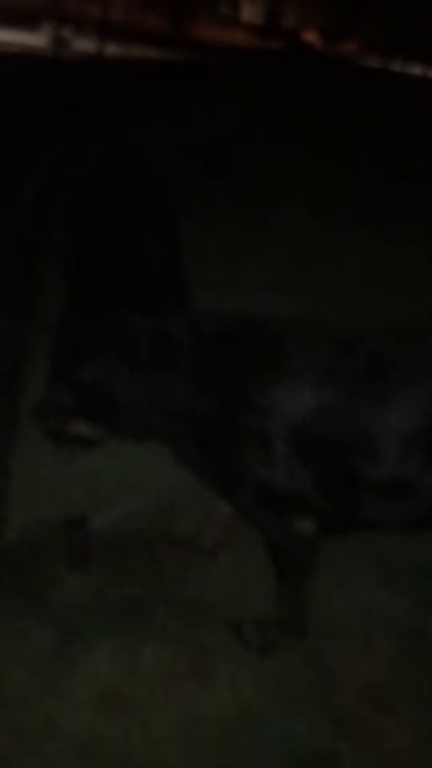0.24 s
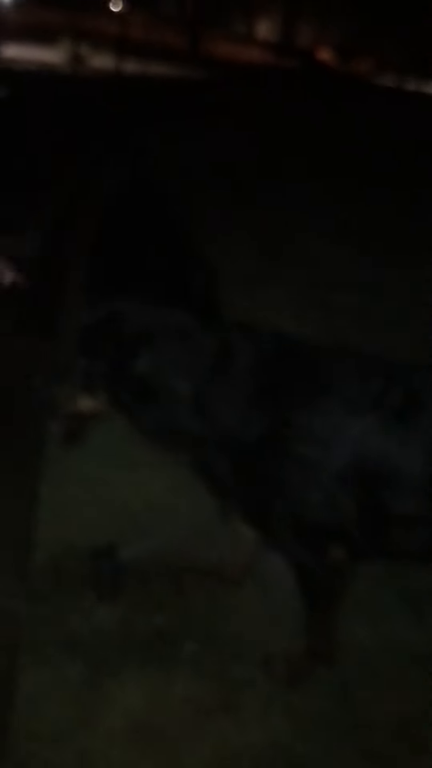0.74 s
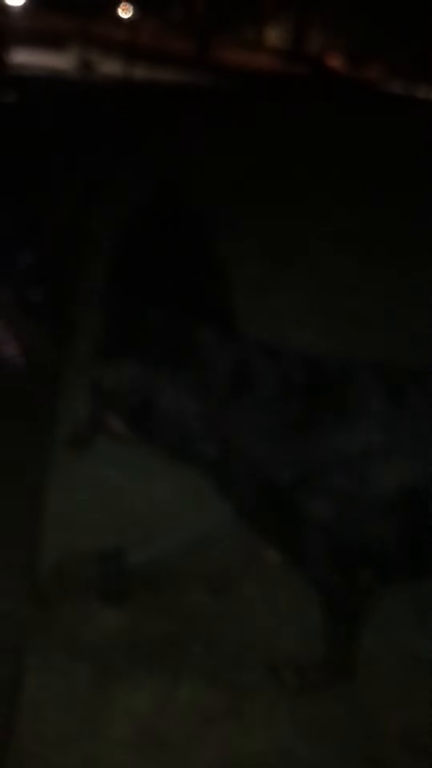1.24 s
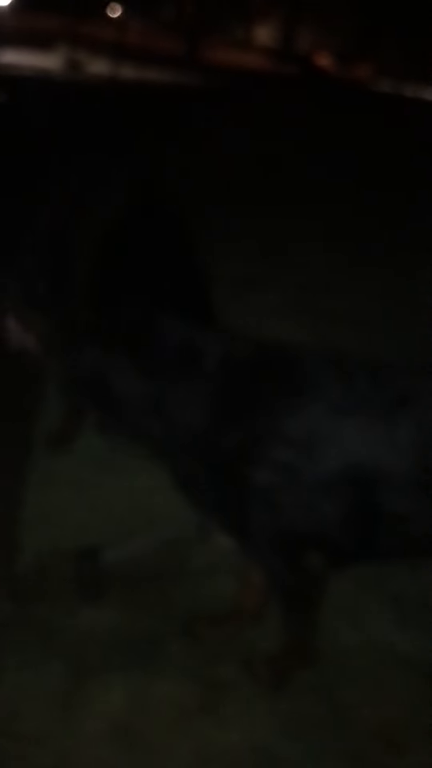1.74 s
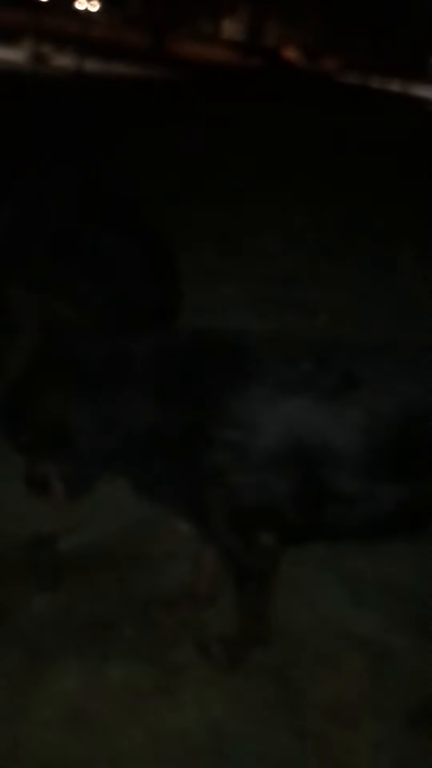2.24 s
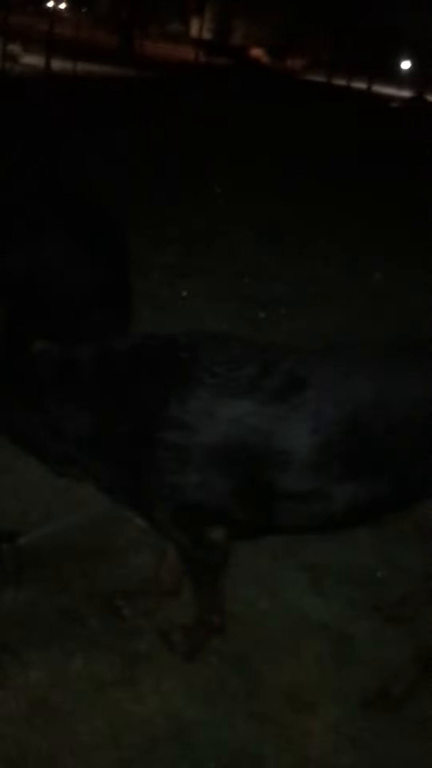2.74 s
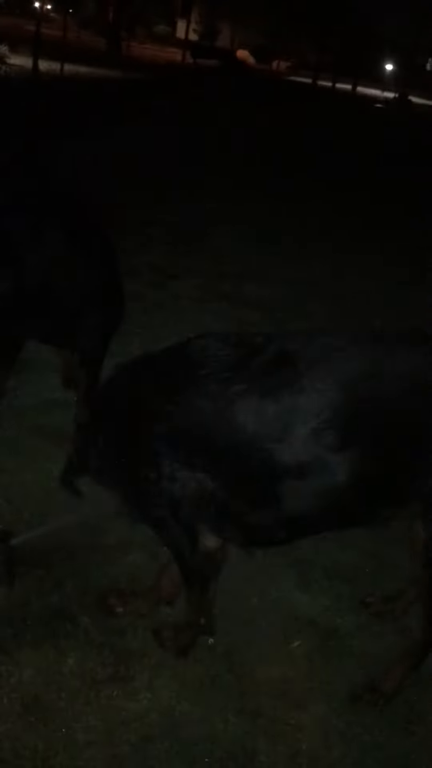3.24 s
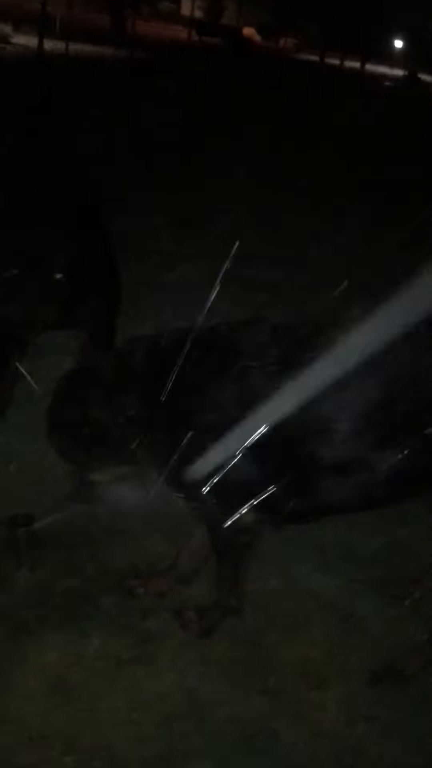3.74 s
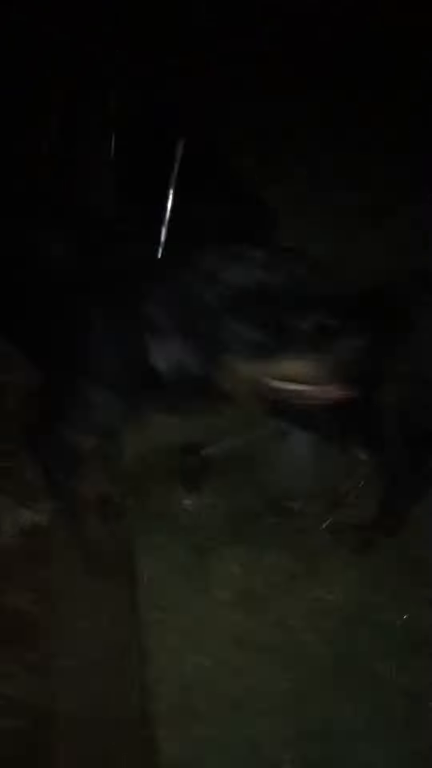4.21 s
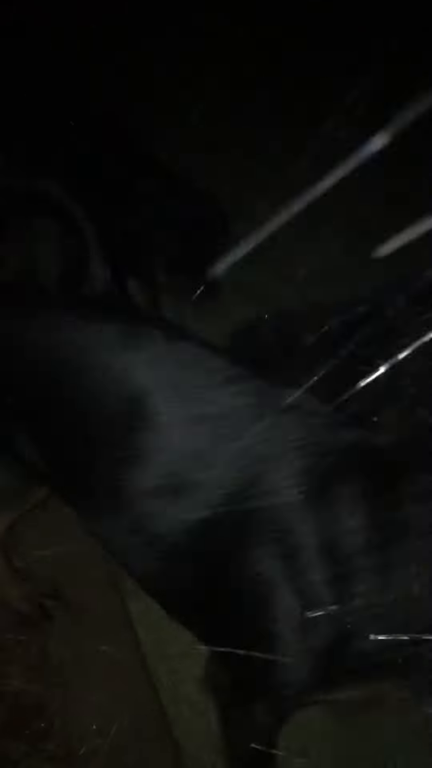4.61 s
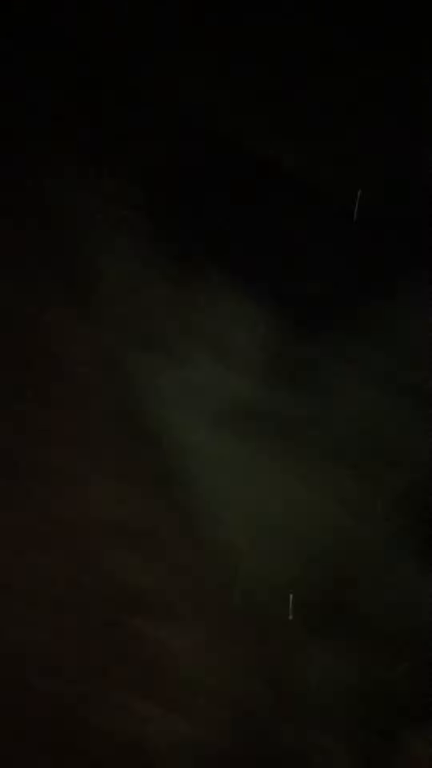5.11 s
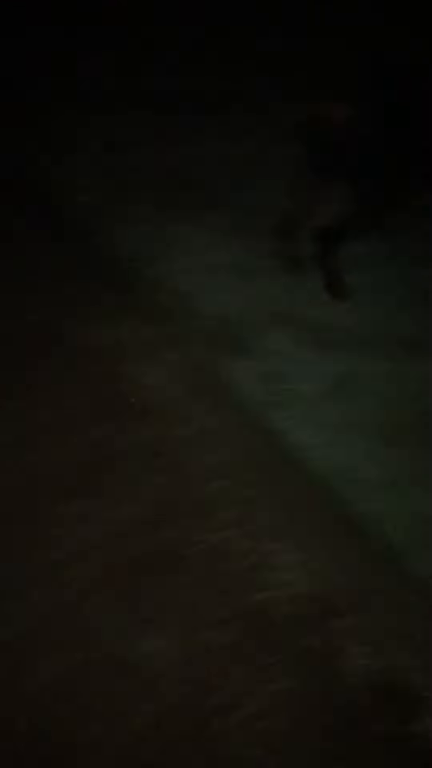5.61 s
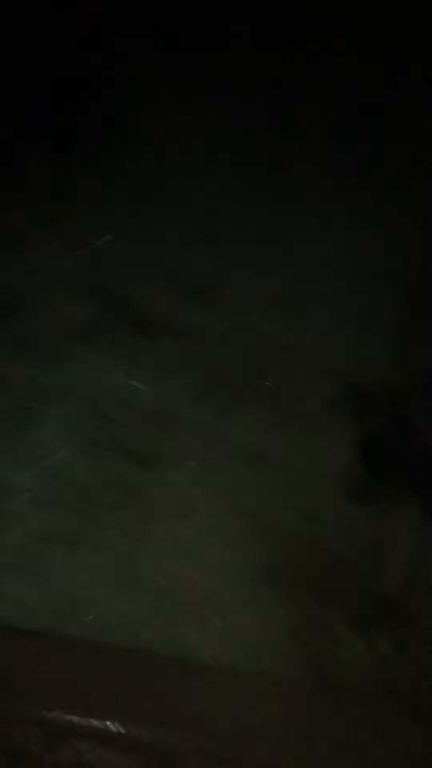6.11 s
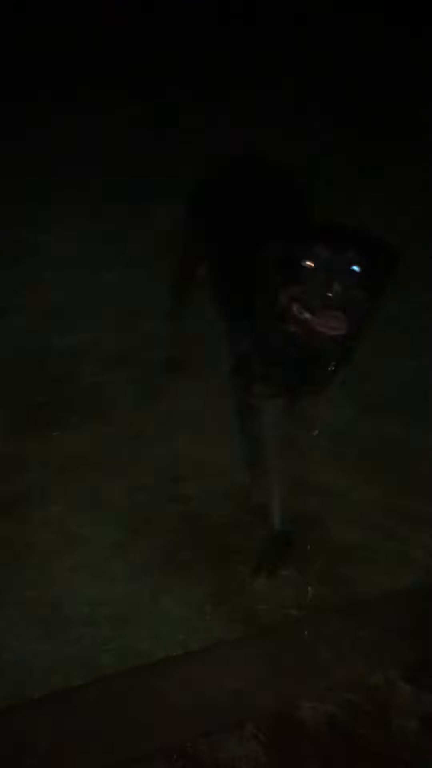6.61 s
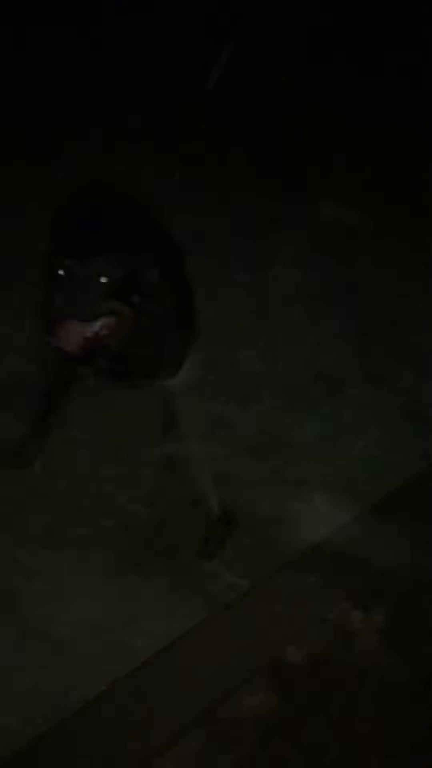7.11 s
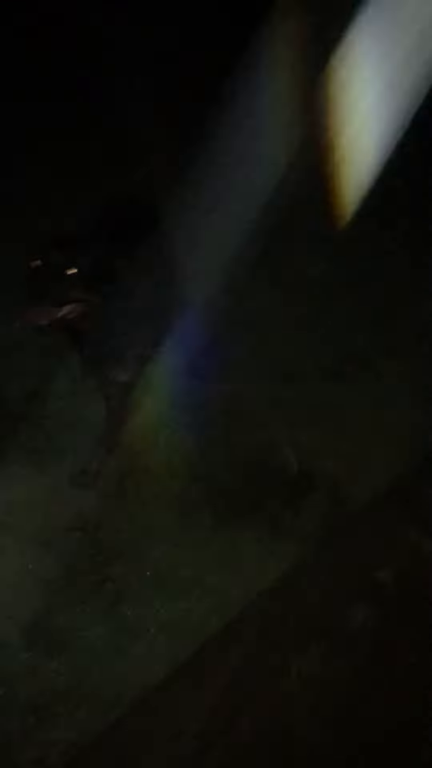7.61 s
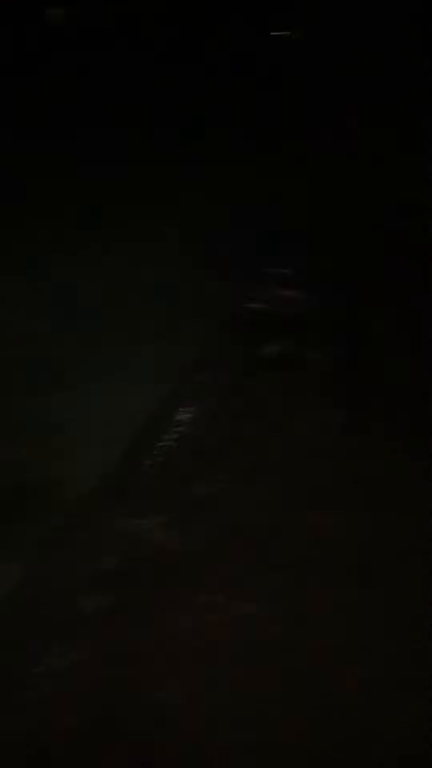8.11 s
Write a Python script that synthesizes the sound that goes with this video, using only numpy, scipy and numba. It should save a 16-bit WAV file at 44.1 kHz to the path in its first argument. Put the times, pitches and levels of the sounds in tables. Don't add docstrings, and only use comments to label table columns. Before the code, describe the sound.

Outdoors in a garden, captured in mono by a hand-held phone: steady bright water hiss with splashy lapping and short raspy pants. The biting grows busier midway, choppy and sputtering, with throaty gulps and sharp slaps of water. Then quick paw steps and clicking claws on hard ground amid low wind thumps. Finally the spray dies down to a faint hiss, panting, last steps and a low far-off town rumble.

```python
import sys
import numpy as np
from scipy import signal
from scipy.fft import rfft, irfft, next_fast_len
from scipy.io import wavfile
from scipy.ndimage import uniform_filter1d
from numba import njit

SR = 44100
rng = np.random.default_rng(int(sys.argv[2]) if len(sys.argv) > 2 else 0)


def to_linear_factor(level_db):
    exponent = np.asarray(level_db, float) / 20
    return 10 ** exponent


def file_out(sig):
    cols = np.atleast_2d(sig).T
    lim = np.clip(cols, -1, 1)
    pcm = np.round(lim * 32767).astype(np.int16)
    wavfile.write(sys.argv[1], SR, pcm)


N = 368235

# f/Hz, level/dB
TOWN_COLOUR = [(30, -28), (70, -7), (150, -5.5), (300, -5), (420, -7), (560, -5), (720, -6.5), (1000, -0.5),
               (2000, -7.5), (4000, -15.5)]
# t/s, level/dB
TOWN_LEVEL = [(0, -46.5), (.69, -51.5), (1.2, -49.5), (2.0, -49.5), (2.6, -48.5), (4.25, -49), (4.5, -46),
              (5.0, -49.5), (5.4, -49), (5.7, -51), (6.03, -48.5), (6.5, -51), (6.58, -53), (6.75, -53),
              (7.0, -51.5), (7.6, -51.5), (8.35, -53)]
# t/s, level/dB
STEADY_AIR = [
    (0, -52),
    (.5, -57),
    (4.3, -50.5),
    (4.7, -53),
    (7.3, -47),
    (8.35, -44.5),
]
# middle t/s, length t/s, level/dB
GUSTS = [(.28, 0.12, -39), (.76, .21, -47), (1.35, 0.3, -47), (1.67, 0.19, -51), (2.07, 0.19, -51),
         (2.3, 0.19, -54), (2.63, .12, -51), (3.05, 0.21, -47), (3.2, 0.23, -55), (3.65, .21, -55),
         (3.95, 0.069, -41), (4.56, 0.42, -47), (5.21, 0.22, -37), (6.49, .11, -43), (6.6, 0.14, -36.5),
         (6.77, 0.096, -27.5), (6.91, 0.12, -30), (7.07, 0.26, -29.5), (7.16, 0.072, -28),
         (7.49, 0.064, -38), (7.63, 0.23, -45), (7.95, 0.13, -41)]
# t/s, peak level/dB, ring f/Hz, claw brightness level/dB
STEPS = [(6.54, -13, 1400, -20), (6.645, -24, 900, -22), (6.753, -24, 800, -16), (6.921, -9, 3400, -8),
         (6.977, -9.5, 1510, -10), (6.991, -21.5, 223, -30), (7.083, -41, 500, -25), (7.18, -17, 900, -14),
         (7.289, -22, 850, -20), (7.388, -7.5, 1730, -5), (7.489, -21.5, 1000, -14), (7.588, -21, 1300, 1),
         (7.684, -25, 950, -12), (7.775, -20.5, 1700, 0.5), (7.863, -21, 1100, -6), (8.11, -30, 1000, -24)]
GROUND_ECHO_S, GROUND_ECHO_DB = .0019, -4
SCUFF_S, SCUFF_DB, SCUFF_TOP_DB = .012, -7, -21
# middle t/s, length t/s, level/dB, lowest throat resonance f/Hz
PANTS = [(0.114, 0.094, -43, 470), (0.398, 0.086, -42.5, 463), (0.684, 0.17, -45, 493),
         (0.963, 0.11, -42, 487), (1.229, 0.099, -46.5, 494), (1.661, 0.09, -44, 750),
         (2.03, 0.17, -39.5, 650), (2.371, 0.15, -43, 610), (2.76, 0.096, -43, 520), (3.24, 0.13, -47, 520),
         (4.094, 0.078, -50, 470), (4.654, 0.16, -41.5, 494), (4.894, 0.077, -41, 670),
         (5.242, 0.1, -43, 543), (5.525, 0.091, -44, 500), (6.476, 0.14, -39.5, 510),
         (6.841, 0.12, -37, 476), (7.207, 0.12, -38.5, 520), (7.54, 0.14, -39, 526),
         (7.76, 0.085, -46, 490), (7.875, 0.13, -37, 496), (8.088, 0.07, -45, 484), (8.215, 0.15, -38, 506)]
# f/Hz, width f/Hz, level/dB
THROAT = [(790, 110, -4), (1040, 120, 0), (1420, 130, -2), (1900, 200, -12), (2570, 250, -13),
          (3300, 400, -21)]
# t/s, level/dB
MIST_LEVEL = [(0, -23.5), (.75, -22), (1.1, -23.5), (1.4, -26), (1.77, -27.5), (1.9, -24), (2.32, -24),
              (3.1, -26.5), (4.07, -25), (4.4, -24), (5.5, -23.5), (6.05, -22.5), (6.12, -25.5),
              (7.13, -22), (7.19, -30.5), (7.4, -33), (7.47, -39), (8.35, -43)]
# f/Hz, level/dB
MIST_COLOUR = [(500, -26.5), (1000, -15), (2500, -1.5), (5000, -0.5), (9200, -2.5), (10400, -3),
               (11500, -0.5), (13000, -0.5), (16000, 0)]
COARSE_HZ, COARSE_WIDTH_HZ, COARSE_FOLLOWS = 4300, 4300, 0.41
# f/Hz, width f/Hz, level over the mist/dB
RIM = [(2710, 170, -2.5), (3410, 430, -10), (4720, 300, -2.5), (6130, 320, -4.5), (7210, 390, -3),
       (8320, 330, -4.5), (9480, 330, -6.5)]
# t/s, share 0-1
FACING = [
    (0, .6),
    (1.3, 0.96),
    (1.85, 1.),
    (3.0, 0.65),
    (4.2, 0.35),
    (5.5, 0.5),
    (7.2, .5),
    (7.5, .1),
]
# middle t/s, length t/s, change of level/dB
SHEETS = [(.1, .3, -3), (1.65, .5, 2), (3.09, .06, 1), (3.72, 0.13, 1), (4.0, 0.27, -2), (4.2, 0.11, 1),
          (4.372, .1, 1.5), (4.82, .12, 3), (5.2, .15, -0.5), (5.497, .1, 2), (5.33, .4, -3),
          (3.855, .06, 4), (5.91, .07, 6), (4.99, .16, -2), (5.75, .4, -2), (6.1, 0.4, -7), (6.63, 0.2, 2),
          (6.82, .1, 4), (7.05, .25, 2.5), (7.37, .12, 1), (7.9, 1.5, 3)]
SHEET_HZ, SHEET_WIDTH_HZ = 13600, 6500
# t/s, level/dB
SPLASH_LEVEL = [(0, -34.5), (.46, -25.5), (1.38, -24.5), (1.44, -45), (1.82, -40), (1.95, -29), (2.4, -27),
                (2.95, -30), (3.3, -29.5), (4.0, -28), (4.3, -32.5), (5.11, -37.5), (5.6, -30.5),
                (6.3, -21.5), (6.7, -33), (7.13, -22.5), (7.2, -39.5), (7.44, -46.5)]
# middle t/s, length t/s, splash change/dB, mist change/dB
SNAPS = [(1.28, 0.18, -9, -3), (1.426, 0.11, -5, -1.5), (5.02, 0.16, 1, -3), (2.13, 0.22, -2.5, -2),
         (3.018, 0.19, -6.5, 4), (3.09, 0.061, 3.5, 5), (4.885, 0.07, -5, -2), (3.36, 0.17, 4.5, -2),
         (3.72, 0.2, -2.5, 4), (3.863, 0.06, -7, -3), (3.99, 0.31, 5, 0.1), (4.202, 0.073, -8.5, 4.5),
         (4.232, 0.032, 8.5, -3.5), (4.335, 0.073, 3, 0.5), (4.44, 0.075, -10, -1),
         (4.55, 0.079, 6.5, -1.5), (4.645, 0.21, -6, -6), (4.925, 0.13, -5, -5), (5.168, 0.026, .3, 5),
         (5.253, 0.34, -14, 3.5), (5.455, 0.22, -16.5, 3.5), (5.6, 0.16, -0.5, -2.5), (5.365, .05, -3, -2),
         (5.138, .02, -4, -4), (4.6, .05, -3, -2), (5.525, .04, -3, -3), (5.932, 0.064, -10.5, -3),
         (5.957, 0.024, 0, 2), (6.065, 0.12, -8, 2.5), (6.47, 0.066, -2.5, 0), (6.527, 0.046, 2.5, 0),
         (6.814, 0.13, -1, -1.5), (7.283, .06, 7, 3), (4.946, .04, -8, -4), (3.447, 0.044, -6, 3.5),
         (6.743, 0.087, -0.5, -1.5), (5.4, 0.2, 0.5, -0.5), (5.7, 0.15, 1, 0), (4.1, 0.15, 0.5, 0),
         (.35, .1, 0, 0), (2.25, 0.12, -0.5, 0.5), (4.787, 0.075, 3, -1), (3.182, 0.035, 3.5, 2.5),
         (1.164, 0.14, 2, -3), (6.202, 0.19, -1.5, 2)]
SNAP_EDGE = .7
# t/s, f/Hz, depth level/dB
HOLLOW = [(0, 2000, -3), (1., 2020, -5), (1.2, 1800, -5), (1.85, 1800, -5), (1.95, 2050, -7),
          (3.0, 2080, -6), (3.15, 1950, -7), (3.62, 1880, -7), (3.76, 2150, -6), (3.87, 2250, -6),
          (3.9, 1700, -3), (4.5, 1900, -2), (5.5, 1950, -3), (6.1, 1700, -3), (6.6, 1650, -5),
          (6.8, 1700, -1.5), (7.0, 1500, -4), (7.3, 1800, -1.5)]
HOLLOW_WIDTH_HZ = 190
# middle t/s, length t/s, level/dB, ring f/Hz
GULPS = [(.4, 0.42, -36.5, 1600), (1.1, 0.28, -35, 1320), (1.653, .06, -38.5, 1200),
         (2.307, 0.17, -48, 1300), (2.9, 0.13, -49, 1300), (3.064, 0.089, -34.5, 1370),
         (3.164, 0.05, -30, 1200), (3.298, 0.082, -30.5, 1350), (3.614, 0.1, -33.5, 1250),
         (3.86, 0.26, -37.5, 821), (4.25, 0.24, -29.5, 1580), (4.432, 0.17, -35.5, 1100),
         (4.611, 0.078, -32.5, 1953), (4.664, 0.11, -36.5, 1100), (4.88, 0.034, -29, 1030),
         (5.155, 0.027, -34.5, 1200), (5.265, 0.11, -31.5, 1100), (5.432, 0.23, -29.5, 1250),
         (5.954, 0.029, -29, 1150), (6.126, 0.071, -30.5, 1350), (6.344, 0.21, -27.5, 1590),
         (6.698, 0.25, -35, 2020), (6.817, 0.056, -36, 940), (6.977, .06, -42, 1200), (3.1, .07, -27, 3900),
         (3.68, .2, -36, 1450), (3.34, .16, -32, 2150), (3.11, .07, -32, 2500), (5.44, .12, -34, 1900),
         (6.14, .12, -31, 3000), (1.2, .06, -30, 3300), (6.61, .1, -34, 4500), (4.95, .14, -38, 2100),
         (3.6, .36, -33, 4000), (3.55, .3, -36, 2400), (.45, .5, -34, 3300), (6.83, .08, -36, 1350),
         (6.712, .03, -32, 1900), (3.372, .14, -28, 2700), (4.795, 0.089, -39, 2450),
         (5.11, .06, -33, 3500), (5.57, .12, -33, 2180), (6.25, .2, -28, 3130), (1.1, 0.28, -32, 2300)]
GULP_WIDTH = 0.51
# t/s, peak level/dB, ring f/Hz
SLUGS = [(0.333, -11, 3480), (1.926, -17, 4740), (2.1909, -19, 6100), (3.2918, -17, 2430),
         (3.366, -13, 3010), (3.3754, -14, 2860), (3.473, -15, 2600), (3.522, -15, 3800),
         (3.742, -15, 3900), (3.957, -13, 3200), (3.5066, -13, 3000), (3.6564, -14, 3770),
         (4.2288, -17, 6300), (4.4578, -16, 5990), (4.6947, -23, 5620), (4.7696, -17, 6160),
         (4.9601, -21, 8230), (5.1547, -11, 8680), (5.4862, -16.5, 2330), (5.6017, -22, 6190),
         (5.8444, -9, 6400), (5.884, -14, 3740), (5.946, -16, 4040), (6.1108, -16, 4500),
         (6.5059, -12, 2310), (6.8713, -14, 4050), (7.0824, -12, 4300)]
SLUG_T60_S, SLUG_WIDTH, SLUG_DB = 0.039, 0.14, -8
LAPPING = 860, 2160, [(1600, 140, -48), (2540, 190, 6.5), (3120, 570, 4), (3730, 380, 9.5), (4580, 530, 4),
           (5960, 800, 10), (7750, 320, 6.5)]
GAPING = 807, 1880, [(1200, 300, -8), (2620, 460, 8.5), (3230, 100, 8.5), (3950, 300, 5), (5380, 300, -5.5),
          (6300, 200, -5.5)]
BITING = 870, 1670, [(1150, 150, -16), (2280, 650, 9), (3170, 700, 8), (4160, 620, 8), (5350, 500, -1),
          (6160, 500, 1)]
GRAZING = 855, 2200, [(1200, 220, -27), (2670, 610, -19), (3840, 230, 0), (4280, 300, 1), (5560, 830, 4),
           (6500, 1800, 10), (7840, 200, 7)]
SIPPING = 1040, 2020, [(1570, 190, -10), (2630, 260, 6), (3370, 560, 8), (4320, 460, 0.5),
           (5670, 710, -3.5), (7040, 360, -5), (8070, 300, -8)]
CHOMPING = 800, 1530, [(1100, 110, -16), (2340, 320, 10.5), (3260, 430, 10.5), (4300, 400, 7),
            (5600, 400, 2), (6400, 500, 1)]
SHAKING = 820, 2400, [(1250, 300, 3), (2720, 490, 6.1), (3870, 300, 10), (6160, 650, 1.5), (8700, 1400, 1)]
CLOSING = 710, 1690, [(1300, 69, 5), (2070, 350, 7), (3110, 600, 9.5), (4050, 900, 9.5), (5800, 600, 6),
           (7000, 900, -8), (8806, 600, -9)]
RESTING = 900, 1900, [(1250, 270, 2), (2550, 250, 1), (3370, 280, 1), (4600, 380, 3), (6160, 360, 4),
           (6900, 300, 2), (8300, 340, 4)]
OPENING = 1090, 2100, [(1580, 200, -11), (2700, 240, 7), (3400, 370, 5), (4000, 300, 11), (5350, 300, 5),
           (7260, 300, -4), (8620, 300, -4)]
SHUTTING = 794, 1700, [(1100, 200, -9), (2410, 180, 1), (3500, 500, -4), (4300, 300, -5), (5730, 300, 6),
            (6200, 300, 9), (8600, 600, -2)]
TEARING = 940, 1930, [(1510, 300, 3), (2370, 200, 6), (3900, 240, 4.8), (6450, 350, 1.8), (7190, 300, 2),
           (8600, 300, 2.8)]
CHEWING = 855, 1720, [(1490, 310, -2), (2160, 260, 1), (3300, 490, -0.5), (4260, 490, 3.5),
           (5700, 400, 1.5), (6450, 610, 6.5), (7540, 1200, 5), (8550, 600, -3)]
# until t/s, shape, stretch of its resonances, gargle level/dB, spatter level re flow/dB
POSE_ROWS = [(.19, OPENING, 1.03, -35, -14), (1.42, SIPPING, 1.01, -40, -3.5),
             (1.849, RESTING, 0.97, -51, -4.5), (3.06, LAPPING, 1, -42, -5), (3.14, GAPING, 1.03, -56, -7),
             (3.451, GAPING, 0.99, -32, -11), (3.869, GAPING, 1.01, -33, -5.5),
             (4.152, CHOMPING, 1, -37.5, -8), (4.439, GAPING, 1.01, -38.5, -1),
             (4.59, GRAZING, 1.04, -36, 2), (4.7, SHUTTING, 1, -39, -14), (4.951, SHUTTING, 1, -36, -4),
             (5.129, SHAKING, 1.02, -39, -4.5), (5.519, TEARING, 1.03, -37, 5),
             (6.09, CHEWING, 1, -35, -0.5), (6.56, BITING, 0.99, -36, -4.5),
             (6.8, CLOSING, 1.02, -42.5, -10), (7.191, CLOSING, 1.03, -48, -5.5),
             (7.458, GRAZING, 1.02, -48, -10)]
POSE_FADE_S = .03
GARGLE_FOLLOWS, SPATTER_FOLLOWS, USUAL_DB = 0.39, 0.61, -26
# f/Hz, width f/Hz, level/dB
PORT_DIPS = [(4900, 350, -4), (7600, 750, -3), (10400, 450, -4.5)]


def unit(x):
    return x / np.sqrt(np.mean(x ** 2))


def curves(table):
    s, *columns = np.transpose(table)
    return [np.interp(np.arange(N) / SR, s, c) for c in columns]


def bump(mid, length, edge):
    from_mid = np.abs(np.arange(N) / SR - mid)
    return np.clip((1 - from_mid / (length / 2)) / edge, 0, 1)


def walk(rate):
    k = int(SR / rate)
    held = np.repeat(rng.standard_normal(N // k + 1), k)
    return unit(uniform_filter1d(uniform_filter1d(held, k), k)[:N])


@njit
def svf(x, hz, width):
    y, b, l = np.empty(len(x)), 0., 0.
    for i in range(len(x)):
        g, k = np.tan(np.pi * hz[i] / SR), width / hz[i]
        v = (b + g * (x[i] - l)) / (1 + g * (g + k))
        b, l, y[i] = 2 * v - b, l + 2 * g * v, k * v
    return y


def ring(x, hz, width_hz):
    return svf(x, hz + np.zeros(len(x)), 1. * width_hz)


def band(x, lo_hz, hi_hz):
    return signal.sosfilt(signal.butter(4, [lo_hz, hi_hz], "band", fs=SR, output="sos"), x)


def colour(x, points):
    hz, db = np.transpose(points)
    size = next_fast_len(len(x))
    f = np.maximum(np.arange(size // 2 + 1) * SR / size, 1)
    gain = to_linear_factor(np.interp(np.log(f), np.log(hz), db, left=-40))
    return unit(irfft(rfft(x, size) * gain, size)[:len(x)])


def droplets(per_s, spread_db, share):
    hit, size, hiss = rng.random(N), rng.exponential(size=N), rng.standard_normal(N)
    drops = (hit < per_s / SR) * np.sign(hiss) * to_linear_factor(spread_db * np.minimum(size, 5))
    return np.sqrt(share) * unit(drops) + np.sqrt(1 - share) * rng.standard_normal(N)


def town():
    level_db = curves(TOWN_LEVEL)[0] + 9.0 + 1.46 * walk(6.6)
    return to_linear_factor(level_db) * colour(rng.standard_normal(N), TOWN_COLOUR)


def buffet():
    air = rng.standard_normal(N)
    flutter = band(air + 3.6 * ring(air, 69.5, 20), 30, 150)
    steady = flutter / np.sqrt(uniform_filter1d(flutter ** 2, size=3000) + 1e-9)
    gust_power = sum((to_linear_factor(db) * bump(mid, length, 0.66)) ** 2 for mid, length, db in GUSTS)
    return to_linear_factor(-5.0) * np.sqrt(to_linear_factor(curves(STEADY_AIR)[0]) ** 2 + gust_power) * steady


def steps():
    out, tick = np.zeros(N), np.zeros(1024)
    tick[0] = 1
    lag, size = int(GROUND_ECHO_S * SR), int(SCUFF_S * SR)
    for s, db, hz, claw_db in STEPS:
        pad = ring(ring(tick, hz, .9 * hz), hz, 3 * hz)
        claw = ring(ring(tick, 5500, 5000), 5000, 9000)
        hit = pad / np.abs(pad).max() + to_linear_factor(claw_db) * claw / np.abs(claw).max()
        hit = hit + to_linear_factor(GROUND_ECHO_DB) * np.roll(hit, lag)
        out[int(s * SR):int(s * SR) + 1024] += to_linear_factor(db) * hit
        grit = rng.standard_normal(1024)
        scuff = unit(ring(grit, hz, hz)) + to_linear_factor(claw_db) * unit(ring(grit, 5500, 5000))
        scuff_gain = to_linear_factor(min(db, SCUFF_TOP_DB) + SCUFF_DB) / 2
        start = int(s * SR) - size // 2
        out[start:start + size] += scuff_gain * np.hanning(size) * scuff[:size]
    return out


def panting():
    out, rasp = np.zeros(N), to_linear_factor(1.6 * walk(110))
    for mid, length, db, low_hz in PANTS:
        count, start = int(length * SR), int((mid - length / 2) * SR)
        air = rng.standard_normal(8192)[:count] * signal.windows.tukey(count, .55)
        throat = [(low_hz, 60, 0)] + THROAT
        puff = sum(to_linear_factor(g) * ring(air, f, min(w, .16 * f)) for f, w, g in throat)
        out[start:start + count] += to_linear_factor(db) * unit(puff * rasp[start:start + count])
    return out


def jet():
    change = sum(np.outer(db, bump(mid, length, SNAP_EDGE)) for mid, length, *db in SNAPS)
    return np.array(curves(SPLASH_LEVEL) + curves(MIST_LEVEL)) + change


def mist(splash_db, mist_db):
    fine = colour(droplets(per_s=3000, spread_db=2.2, share=.2), MIST_COLOUR)
    lost = 1 - to_linear_factor(COARSE_FOLLOWS * np.minimum(splash_db - curves(SPLASH_LEVEL)[0], 0))
    flicker_db = .7 * walk(36) + .7 * walk(16)
    facing = np.clip(curves(FACING)[0], 0, 1)
    rim = sum(to_linear_factor(db) * ring(fine, hz, width) for hz, width, db in RIM)
    fine = fine + facing * (rim - 0.31 * ring(fine, 5000, 9800))
    sheet_db = sum(db * bump(mid, length, SNAP_EDGE) for mid, length, db in SHEETS) + 0.43 * walk(10)
    fine = fine + (to_linear_factor(sheet_db) - 1) * ring(fine, SHEET_HZ, SHEET_WIDTH_HZ)
    coarse = ring(fine, COARSE_HZ, COARSE_WIDTH_HZ)
    return to_linear_factor(mist_db - 0.47 + flicker_db) * (fine - lost * coarse)


def slugs():
    out, t = np.zeros(N), np.arange(2048) / SR
    for s, db, hz in SLUGS:
        burst = unit(ring(rng.standard_normal(2048), hz, SLUG_WIDTH * hz))
        decay = to_linear_factor(-60 * t / SLUG_T60_S)
        out[int(s * SR):int(s * SR) + 2048] += to_linear_factor(db + SLUG_DB) * burst * decay
    return out


def gulps(drops):
    out = np.zeros(N)
    for mid, length, db, hz in GULPS:
        span = slice(int((mid - length / 2) * SR), int((mid + length / 2) * SR))
        width = GULP_WIDTH * hz
        gargle = unit(ring(ring(drops[span], hz, width), hz, width))
        out[span] += to_linear_factor(db) * bump(mid, length, 0.84)[span] * gargle
    return out


def mouth(drops, wobble, stretch, low_hz, hollow_hz, resonances):
    rung = .22 * np.roll(drops, 999)
    for k, (hz, width, db) in enumerate(resonances):
        jaw = .008 * np.roll(wobble, 3001 * k)
        wet_db = 1.3 * np.roll(wobble, -4001 * k - 2000)
        width = np.clip(width, .06 * hz, .3 * hz)
        rung = rung + to_linear_factor(db + wet_db) * ring(drops, hz * (stretch + jaw), width)
    gargle = unit(band(rung, low_hz, 0.886 * hollow_hz))
    body = unit(band(rung, hollow_hz, 4970))
    spatter = unit(band(rung, 5070, 9130))
    return gargle, body, spatter


def splash(body_db, mist_db):
    drops = droplets(per_s=1500, spread_db=3.5, share=0.37) * to_linear_factor(0.29 * walk(50))
    wobble = walk(45)
    mist_db = mist_db + 2.6 * walk(26)
    out, start, fade = gulps(np.roll(drops, 5000)), 0, int(POSE_FADE_S * SR)
    for until, shape, stretch, gargle_db, spatter_db in POSE_ROWS:
        stop = int(until * SR) + fade // 2
        i = np.arange(stop - start)
        blend = np.sqrt(np.minimum(1, np.minimum(i, i[::-1]) / fade))
        if start == 0:
            blend[:fade] = 1
        flow_db, spray_db = body_db[start:stop], mist_db[start:stop]
        gargle_gain = to_linear_factor(gargle_db + GARGLE_FOLLOWS * (flow_db - USUAL_DB))
        spatter_gain = to_linear_factor(spatter_db + SPATTER_FOLLOWS * flow_db + (1 - SPATTER_FOLLOWS) * spray_db)
        stretch = np.clip(stretch, .96, 1.04)
        gargle, body, spatter = mouth(drops[start:stop], wobble[start:stop], stretch, *shape)
        out[start:stop] += blend * (gargle_gain * gargle + to_linear_factor(flow_db) * body + spatter_gain * spatter)
        start = stop - fade
    return out


def scene():
    flow = jet()
    spray = splash(*flow) + mist(*flow)
    hollow_hz, depth_db = curves(HOLLOW)
    cancelled = 1 - to_linear_factor(np.minimum(depth_db, 0))
    spray = spray - cancelled * ring(spray, hollow_hz, HOLLOW_WIDTH_HZ)
    mono = town() + buffet() + steps() + panting() + slugs() + spray
    for hz, width, db in PORT_DIPS:
        mono = mono - (1 - to_linear_factor(db)) * ring(mono, hz, width)
    return np.array([mono, mono])


def low_pass(x):
    return signal.sosfilt(signal.butter(12, 17070, fs=SR, output="sos"), x)


def record(dry):
    rounded = np.tanh(1.177 * dry) / 1.016
    top_cut = signal.ellip(12, .2, 90, 15700, fs=SR, output="sos")
    mix = signal.sosfilt(top_cut, rounded)
    return low_pass(mix)


dry = scene()
out = record(dry)
file_out(out)
```